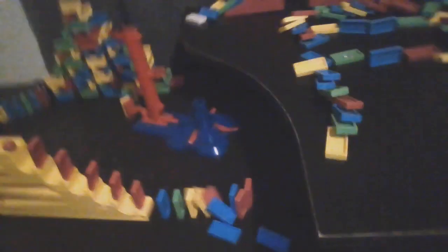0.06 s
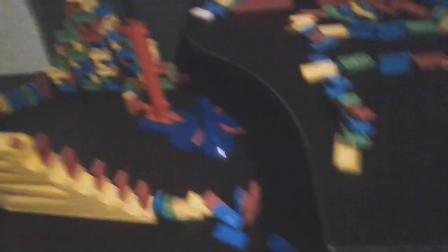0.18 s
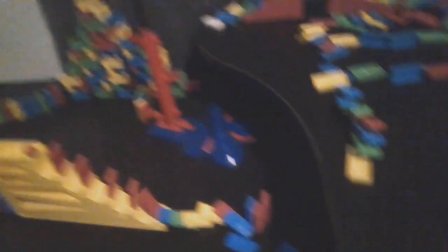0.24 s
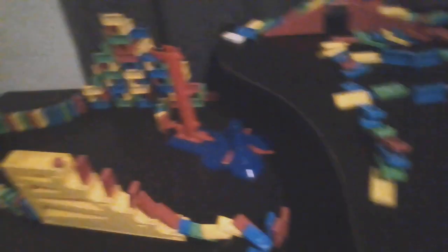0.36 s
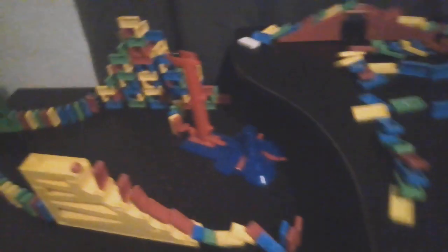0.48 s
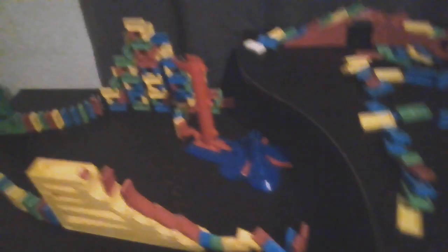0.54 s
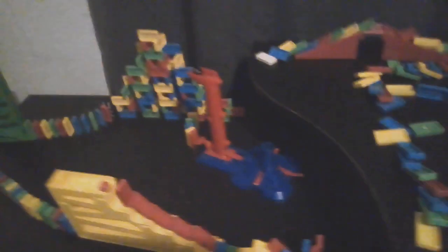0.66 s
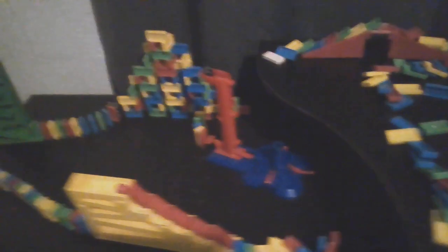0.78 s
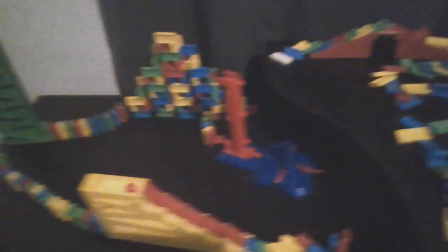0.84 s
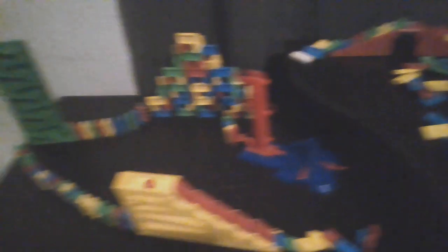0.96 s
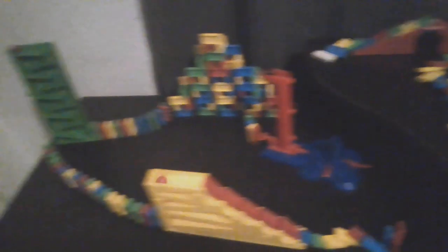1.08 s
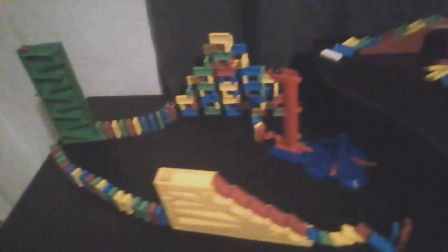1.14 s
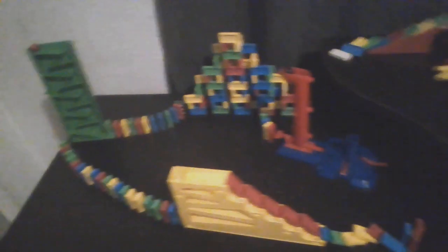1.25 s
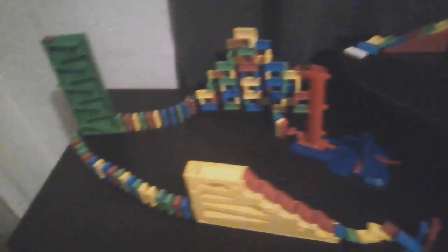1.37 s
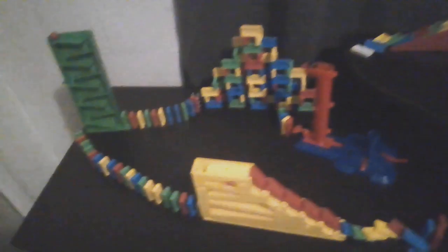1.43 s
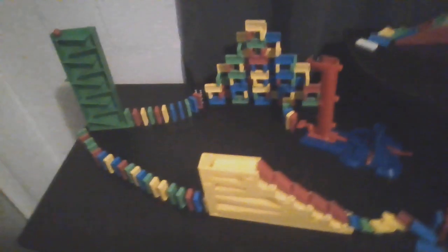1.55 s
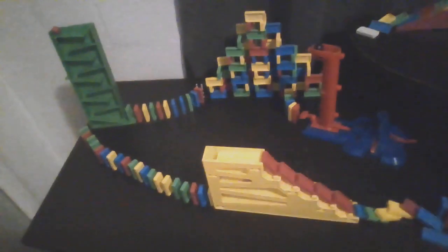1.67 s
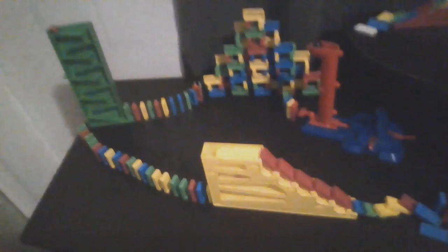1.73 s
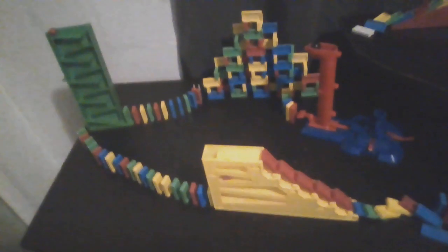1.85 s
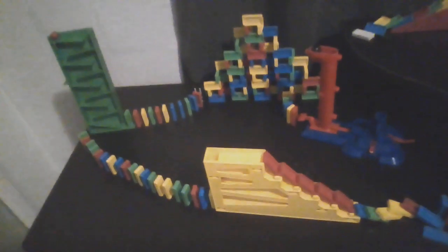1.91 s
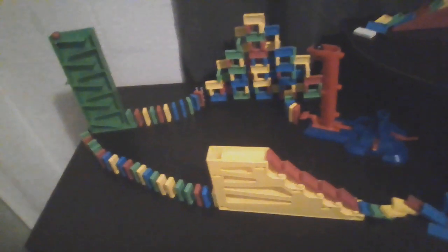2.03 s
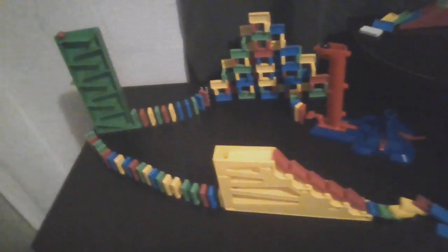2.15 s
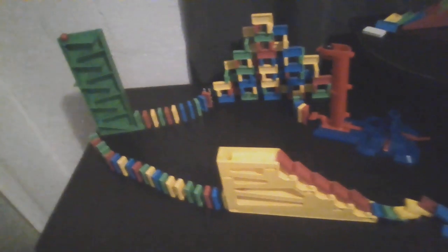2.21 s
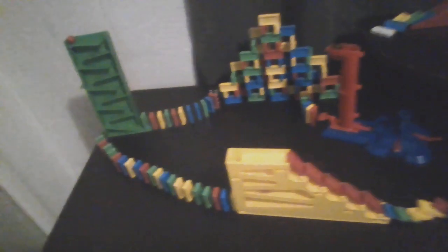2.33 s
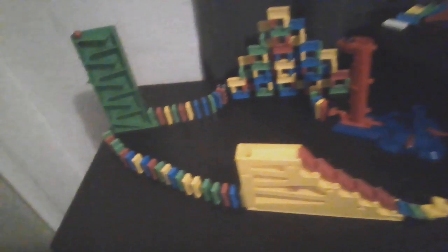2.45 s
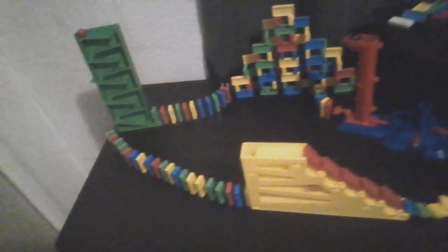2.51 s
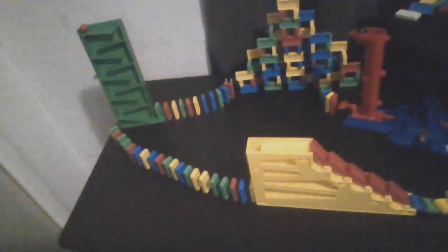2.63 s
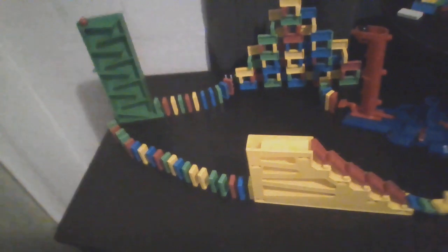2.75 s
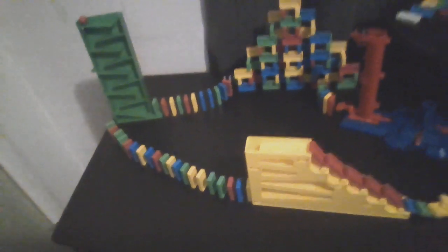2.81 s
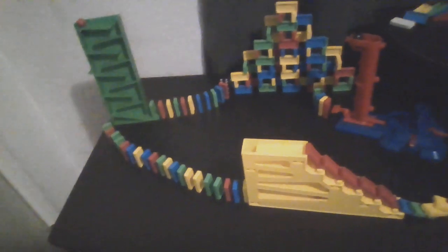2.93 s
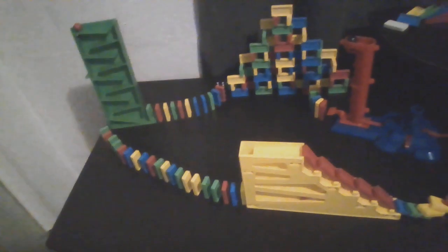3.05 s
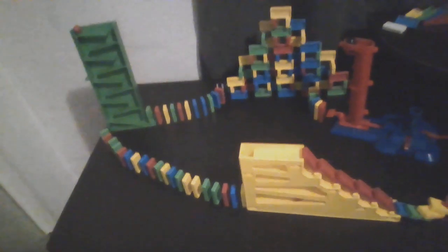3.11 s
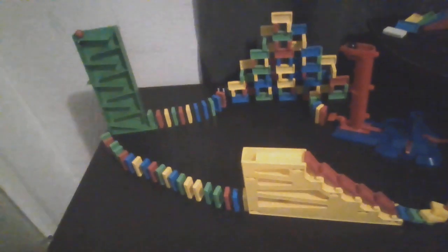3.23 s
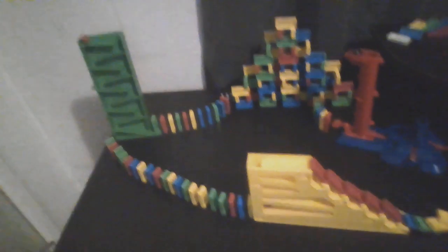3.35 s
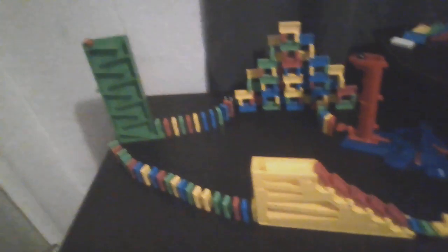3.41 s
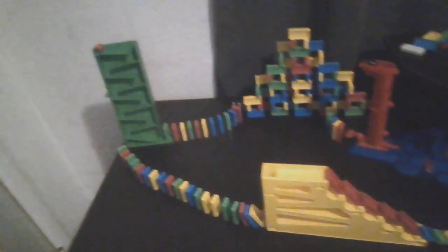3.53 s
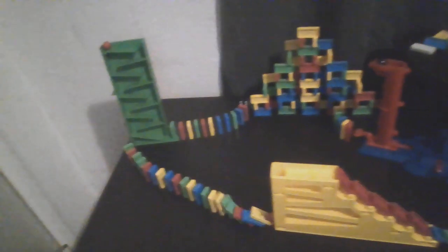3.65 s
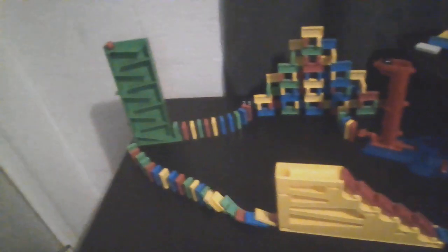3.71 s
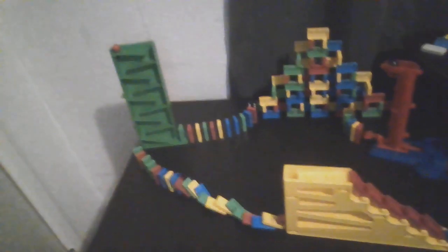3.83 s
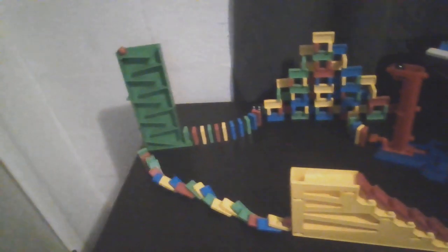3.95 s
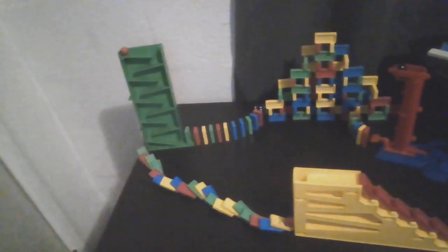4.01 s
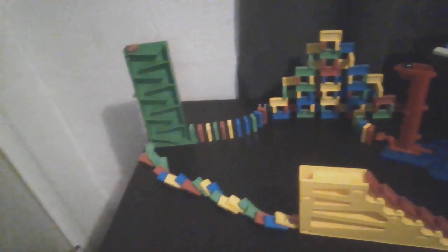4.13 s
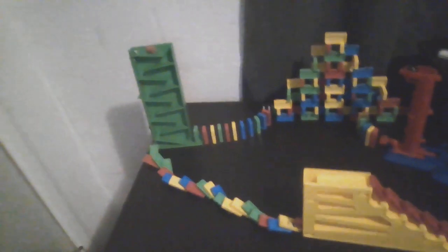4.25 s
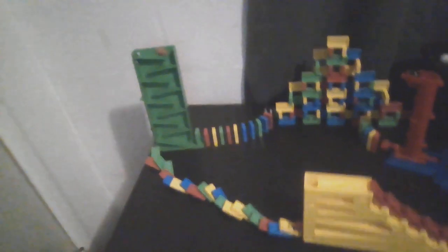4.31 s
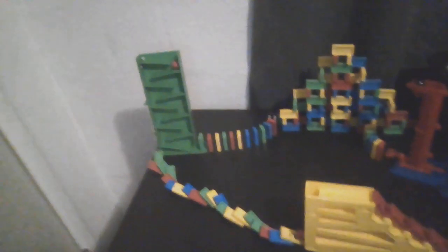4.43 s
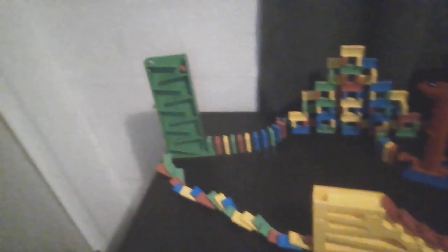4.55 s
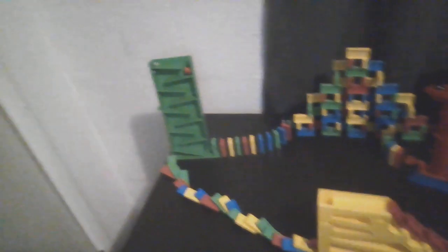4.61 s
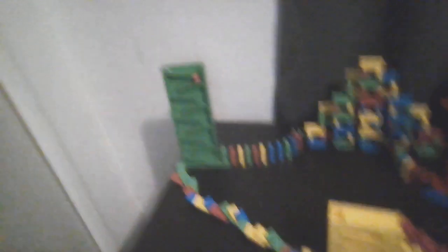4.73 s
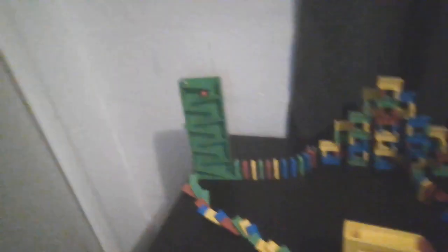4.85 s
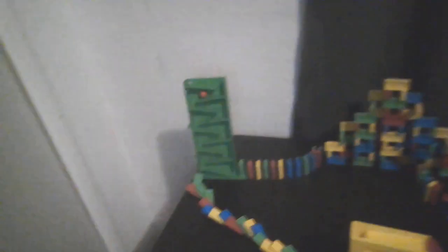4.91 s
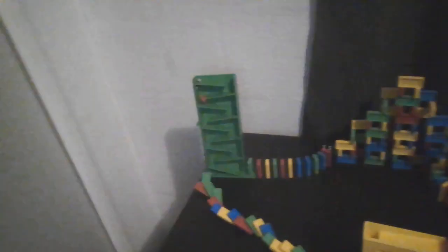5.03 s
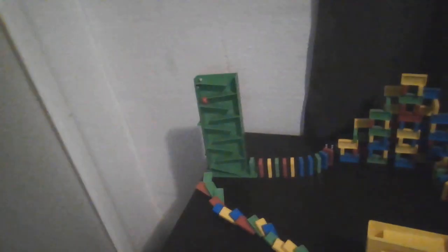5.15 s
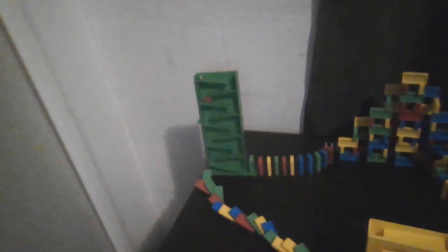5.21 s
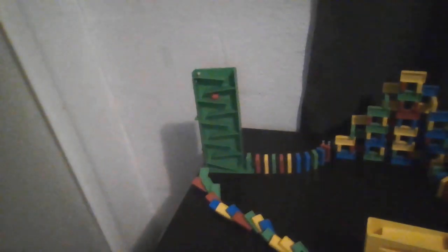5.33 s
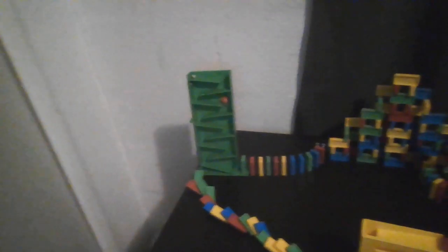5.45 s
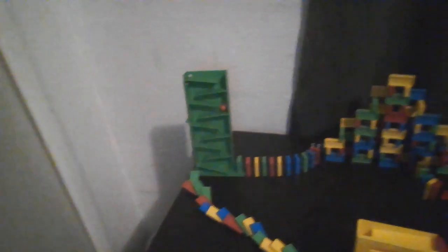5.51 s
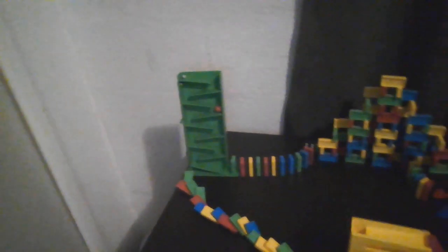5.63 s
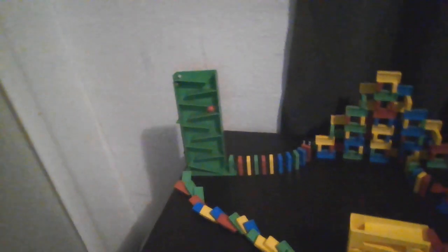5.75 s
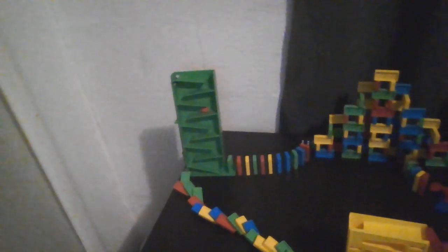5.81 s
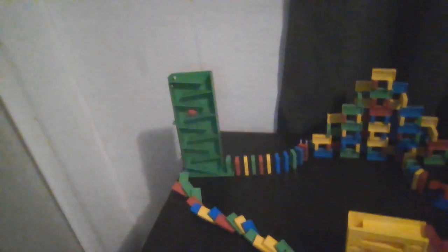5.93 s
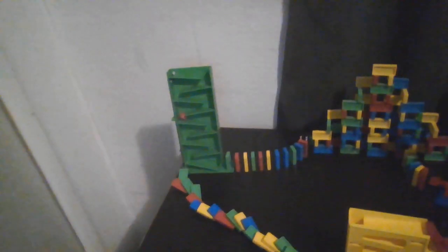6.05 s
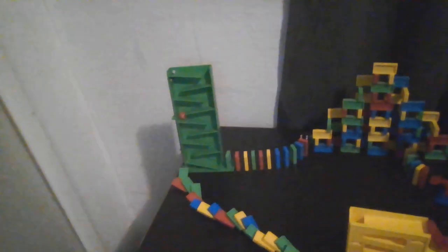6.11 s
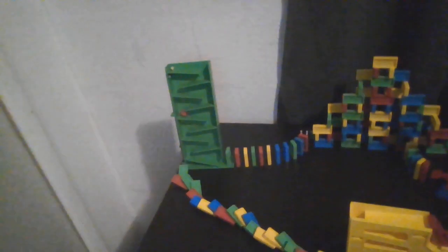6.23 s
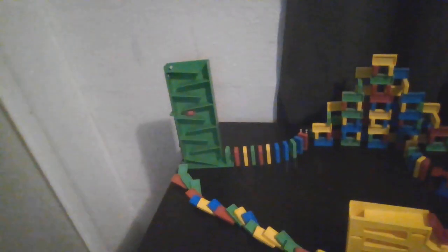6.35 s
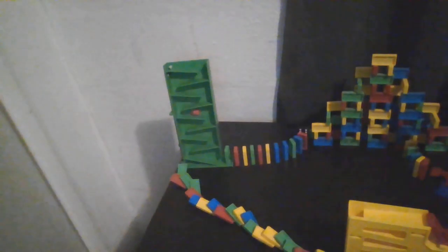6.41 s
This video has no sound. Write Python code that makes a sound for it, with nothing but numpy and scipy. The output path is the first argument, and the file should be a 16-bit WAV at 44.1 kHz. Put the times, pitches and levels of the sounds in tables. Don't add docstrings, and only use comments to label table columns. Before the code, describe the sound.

In a small, fairly dry room, bright plastic tile clicks slow to separate clacks. A marble scrapes and knocks down a hollow zigzag ramp, its rolling swelling before each blow. Then a rapid domino rattle leads to spaced clusters of hollow drops and shrinking bounces in a plastic tower. Hand movement rumbles and fingers bump the microphone; the loudest knocks sound slightly squashed.

```python
import sys
import numpy as np
from scipy import signal
from scipy.io import wavfile

SR = 44100
rng = np.random.default_rng(int(sys.argv[2]) if len(sys.argv) > 2 else 0)


def linear_from_db(decibels):
    return 10 ** (np.asarray(decibels, float) / 20)


def pcm_store(signal):
    levels = np.round(np.clip(np.atleast_2d(signal), -1, 1) * 32767)
    wavfile.write(sys.argv[1], SR, levels.astype(np.int16).T)


N = 285768

# (ratio to the first mode [1], level [dB], decay t60 [s])
TILE_UPPER_MODES = [(1.09, 3.5, 0.0084), (1.16, -6.5, .016), (1.48, -5.5, 0.055), (1.575, -9.5, 0.035),
                    (2.092, -1, 0.043), (2.421, -14, 0.036), (3.079, -13.5, 0.028)]
# (time [s], peak [dB], relative treble [dB], strongest mode [Hz], second mode [Hz])
RAMP_BLOWS = [(1.1656, -2, -8, 3613, 5160), (1.174, -6, -4.5, 2080, 3780), (1.1846, -8, -8.5, 2053, 2910),
              (1.1985, 0, -7, 3504, 2910), (1.2093, -26, -4.5, 3600, 2920),
              (1.2448, -10.5, -4.5, 3590, 2863), (1.2685, -11.5, -9.5, 3495, 2923),
              (1.5826, -1.5, -9.5, 3583, 5310), (1.6076, 0, -4.5, 2920, 5005), (1.609, -14, -8, 1730, 5630),
              (1.6383, -15.5, -7.5, 2973, 5050), (1.9892, -3.5, -5.5, 5080, 3574),
              (2.0148, 0.5, -9, 2920, 3510), (2.016, -11.5, 5, 4740, 7590), (2.061, -8, -6.5, 2880, 3423),
              (2.673, -1, 1, 2650, 1560), (2.6805, -4.5, -15.5, 3509, 3020), (2.712, -6.5, 3.5, 2752, 5700),
              (2.7215, -5.5, -12.5, 2400, 3344), (2.7305, -16, -5.5, 3660, 4610),
              (2.75, -7, -7.5, 2460, 5640), (2.7731, -11.5, -11, 2460, 5760)]
RISE_CYCLES = 1.6
TICK_HZ = 7000


def rms_one(x):
    return x / np.sqrt(np.mean(x ** 2) + 1e-20)


def in_time(rows, outside):
    s, *columns = np.transpose(rows)
    return [np.interp(np.arange(N) / SR, s, c, outside, outside) for c in columns]


def band(x, kind, hz, order=2):
    return signal.sosfilt(signal.butter(order, hz, kind, fs=SR, output="sos"), x)


def spikes(times, heights):
    return np.bincount(np.round(np.asarray(times) * SR).astype(int), heights, N)[:N] + 1e-18


def ring(clicks, hz, t60):
    r, w = linear_from_db(-60 / (t60 * SR)), 2 * np.pi * hz / SR
    return signal.lfilter([0, np.sin(w)], [1, -2 * r * np.cos(w), r * r], clicks)


def dying(times, level_db, t60):
    power = spikes(times, linear_from_db(2 * level_db))
    return np.sqrt(signal.lfilter([1], [1, -linear_from_db(-120 / (t60 * SR))], power))


def taps(times, level_db, hz, t60):
    out, t = np.zeros(N + SR), np.arange(SR // 10) / SR
    for s, db, f in zip(times, level_db, hz):
        at = round(s * SR)
        rise = 1 - np.exp(-t * f / RISE_CYCLES)
        out[at:at + len(t)] += linear_from_db(db - 60 * t / t60) * np.sin(2 * np.pi * f * t) * rise
    return out[:N]


def clatter(times, level_db, treble_db, linger, crack_db):
    # (frequency [Hz], level per Hz [dB], decay t60 [s])
    dense_modes = [(298.4, -15.5, 0.27), (930, -9, 0.015), (1240, -10, 0.26), (2400, -9.5, 0.17),
                   (5000, -2, 0.14), (6070, -24, 0.14), (8700, -16.5, 0.15), (10700, -16.5, 0.13),
                   (16300, -17.5, 0.16)]
    hz, per_hz_db, t60 = np.transpose(dense_modes)
    edges = 250 * 2 ** np.arange(0, 6.1, .5)
    white = rng.standard_normal((2, N))
    out = 0
    for k, (low, high) in enumerate(zip(edges, edges[1:])):
        center = np.log(low * high) / 2
        treble = np.clip(np.log2(low / 2500), 0, 1) * treble_db
        blow_db = level_db + treble + np.interp(center, np.log(hz), per_hz_db)
        tail_t60 = linger * np.interp(center, np.log(hz), t60)
        start = times + RISE_CYCLES / low
        tail = dying(start, blow_db, tail_t60)
        crack = dying(start, blow_db + crack_db + 4.9 * np.log2(low / 2000), 0.017)
        out = out + band(white[k % 2], "band", [low, high]) * (tail + crack)
    return out


def tile_contacts():
    # (time [s], ring [dB], first bending mode [Hz], relative table clack [dB])
    step_chain = [(0.0002, -11, 5000, -0.5), (0.042, -23.5, 5000, 1), (0.046, -26, 5000, 7),
                  (0.0957, -34, 5000, 6.5), (0.0139, -1, 4996, -37.5), (0.051, 0.5, 5000, -20.5),
                  (0.0594, 0.5, 4970, -15), (0.0715, -14.5, 4970, -15), (0.0755, -5.5, 4970, -18),
                  (0.1006, -15.5, 5000, -6.5), (0.1225, -20.5, 5000, 3), (0.1255, -8.5, 5000, -26.5),
                  (0.1368, -29.5, 4840, -8.5), (0.16, -10, 4970, -2.5), (0.1842, -12.5, 5050, -14.5),
                  (0.2317, -11, 5000, 3), (0.2365, -11, 4970, -4), (0.2447, -10.5, 4850, -2),
                  (0.2689, -23.5, 5070, -18), (0.2887, -17.5, 5330, -1.5), (0.349, -46, 5000, 17.5),
                  (0.4052, -21, 5065, 2), (0.4165, -26, 5150, 8.5), (0.536, -8.5, 5080, -3.5),
                  (0.549, -21, 5360, 2), (0.651, -22, 5120, 7), (0.6555, -9.5, 5233, -2),
                  (0.663, -22, 5300, 2.5), (0.772, -12.5, 5340, -1), (0.791, -23, 5250, -8),
                  (0.8266, -24.5, 5120, 10)]
    # (time [s], ring [dB], relative upper modes [dB], relative table clack [dB])
    flat_chain = [(3.4712, -16, -4.5, -2), (3.4974, -10.5, -10.5, -18.5), (3.5495, -18, -10, -22.5),
                  (3.5948, -23, -6.5, 5), (3.6046, -12.5, -8.5, -9), (3.6111, -18, -8, 9),
                  (3.6482, -14.5, -2, 1.5), (3.6703, -14.5, -3, 0), (3.6882, -9, 3, -4),
                  (3.7104, -11.5, 3.5, -1), (3.7324, -0.5, -9, -16), (3.7582, -9.5, 0.5, -8.5),
                  (3.7775, -6.5, -3.5, -6), (3.8043, -3, -7.5, -14.5), (3.8308, -4, -7.5, -6),
                  (3.8562, -8.5, -4, -5), (3.8784, -3.5, 1, -10.5), (3.8996, -12, 5, -19.5),
                  (3.9215, -9, -0.5, -12), (3.9395, -7.5, -15.5, -25.5), (3.9506, -9, 1.5, -9.5),
                  (3.9738, -2.5, -3.5, -13), (3.9882, -4, -6.5, -13), (4.0058, -5.5, -3.5, -6),
                  (4.0137, -3, -14, -15.5), (4.028, -10.5, -10.5, -12.5), (4.0465, -4, -9.5, -11.5),
                  (4.068, -11, 0, -15.5), (4.0822, -12, 8.5, 1), (4.0924, -20, 5, 7.5)]
    # (time [s], ring [dB])
    tile_slips = [(3.6255, -13), (3.6365, -11.5), (3.661, -15.5), (3.6785, -21.5), (3.7178, -20),
                  (3.7465, -19), (3.766, -8.5), (3.795, -9.5), (3.8115, -12), (3.8225, -10.5),
                  (3.8451, -10), (3.866, -9), (3.886, -16), (3.9035, -3), (3.911, -7), (3.932, -5),
                  (3.957, -8), (3.965, -21), (3.999, -11.5), (4.035, -11.5), (4.0575, -7), (4.1025, -20.5),
                  (4.116, -14.5)]
    first = np.array(step_chain)
    upper_db = -4 + 0.28 * first[:, 3]
    first = np.insert(first, 3, upper_db, axis=1)
    slips = [(s, db, -9.5, -10) for s, db in tile_slips]
    second = np.array(list(flat_chain) + slips)
    tile_hz = 5020 * (1 + .014 * rng.standard_normal(len(second)))
    return np.vstack([first, np.insert(second, 2, tile_hz, axis=1)])


def tile_rings(rows):
    out, t = np.zeros(N + SR), np.arange(SR // 8) / SR
    ratio, mode_db, t60 = np.repeat(np.transpose(TILE_UPPER_MODES), 2, axis=1)[:, :, None]
    luck = rng.random((len(rows), 4 + 6 * len(TILE_UPPER_MODES)))
    for (s, level_db, hz, upper_db, _), u in zip(rows, luck):
        partner_hz = hz * (1 + 0.075 * (u[:2, None] - .4))
        partners = np.sin(2 * np.pi * (partner_hz * t + u[2:4, None]))
        first = np.sin(2 * np.pi * hz * t) + 0.14 * partners.sum(axis=0)
        first = first * (1 - np.exp(-t / 0.0015))
        upper_hz = hz * ratio * (1 + 0.05 * (u[4::3, None] - .5))
        upper = np.sin(2 * np.pi * (upper_hz * t + u[5::3, None]))
        fading = linear_from_db(mode_db + 10 * (u[6::3, None] - .9) - 60 * t / t60)
        upper = np.sum(upper * fading, axis=0)
        at = round(s * SR)
        out[at:at + len(t)] += linear_from_db(level_db + 0.5 - 60 * t / 0.036) * first
        out[at:at + len(t)] += linear_from_db(level_db + upper_db - 8.5) * upper
    return out[:N]


def tile_chatter(rows):
    chatter_pitches = (4990, 5130, 5330)
    s, level_db, hz, upper_db, _ = rows.T
    white = rng.standard_normal(N)
    nearest = np.argmin(abs(hz[:, None] - chatter_pitches), axis=1)
    out = np.zeros(N)
    for k, f in enumerate(chatter_pitches):
        mine = nearest == k
        out += rms_one(ring(white, f, 0.03)) * dying(s[mine], level_db[mine] - 17, 0.1)
    for multiple, rel_db, _ in TILE_UPPER_MODES:
        hum = rms_one(ring(white, 5060 * multiple, 0.019))
        out += hum * dying(s, level_db + upper_db + rel_db - 25.0, 0.17)
    return out


def tiles():
    # (frequency [Hz], level [dB], decay t60 [s])
    board_modes = [(403, -36.5, 0.037), (570, -20, 0.03), (1210, -40, 0.043), (3400, -17.5, 0.042)]
    rows = tile_contacts()
    s, level_db, _, upper_db, clack_db = rows.T
    out = tile_rings(rows) + tile_chatter(rows)
    for board_hz, board_db, board_t60 in board_modes:
        luck_db = 3.1 * rng.standard_normal(len(s))
        thuds = spikes(s, linear_from_db(level_db + clack_db + board_db + luck_db))
        out += ring(thuds, board_hz, board_t60)
    out += band(spikes(s, linear_from_db(level_db + upper_db - 1.5)), "high", TICK_HZ)
    treble_db = 0.42 * (upper_db - clack_db) - 11.5
    return out + clatter(s, level_db + clack_db + 2.0, treble_db, linger=.75, crack_db=-5)


def landings():
    # (time [s], peak [dB], pitch [Hz])
    step_landings = [(.0001, 3, 5200), (.0145, -17.5, 1490), (.0965, -20.5, 2800), (.162, -16.5, 2520),
                     (.538, -16.5, 3450), (.66, -16, 1250), (.778, -22.5, 1730), (0.0463, -16.5, 2700),
                     (0.0588, -16, 2910), (0.096, -18.5, 1510), (0.1221, -14, 3470), (0.1595, -19, 3600),
                     (0.184, -22, 3550), (0.2402, -7, 3250), (0.2887, -20.5, 2590), (0.3514, -36, 2500),
                     (0.407, -24, 1240), (0.4163, -18, 1200), (0.535, -12, 1210), (0.6569, -10.5, 3620),
                     (0.7765, -15.5, 3350), (0.829, -14, 3730)]
    flat_landings = [(3.4693, -32, 2720), (3.4815, -37, 3360), (3.4983, -25, 3490), (3.5304, -33, 3600),
                     (3.551, -32, 3510), (3.5942, -15.5, 3290), (3.612, -14.5, 3270), (3.657, -12, 3320),
                     (3.6888, -11.5, 2710), (3.7092, -17, 3240), (3.7296, -16.5, 2710),
                     (3.7497, -14.5, 2590), (3.7764, -22, 2600), (3.7994, -20.5, 3240),
                     (3.8309, -15.5, 2380), (3.8534, -27.5, 3780), (3.8788, -16.5, 3200),
                     (3.9288, -16, 3410), (3.9497, -16.5, 2890), (3.9792, -10, 3450), (3.9927, -11, 3420),
                     (4.0275, -11.5, 3250), (4.0473, -15.5, 3150), (4.0817, -12, 3140), (4.1378, -35, 2200)]
    s, level_db, hz = np.transpose(list(step_landings) + list(flat_landings))
    return taps(s, level_db - 6.5, hz, 0.036)


def room(x):
    t60 = 0.23
    t = np.arange(SR // 2) / SR
    tail = band(rng.standard_normal(len(t)), "low", 6000, order=1) * linear_from_db(-60 * t / t60) * (t > .004)
    return signal.fftconvolve(x, tail / np.sqrt(np.sum(tail ** 2)))[:N]


def handling():
    # (time [s], level [dB])
    hand_sway = [(0.0, -45), (0.38, -25), (1.12, -36), (1.33, -28), (2.29, -42), (2.31, -38), (3.21, -37),
                 (3.25, -21), (3.28, -33.5), (3.52, -40.5), (3.55, -16.5), (3.61, -44.5), (3.66, -40),
                 (4.98, -37), (5.02, -42), (5.36, -29), (6.44, -46.5), (6.48, -39.5)]
    # (time [s], peak [dB], pitch [Hz])
    finger_thumps = [(0.349, -16.5, 168), (0.4466, -20, 170), (0.7326, -24.5, 116), (0.9486, -32, 128),
                     (1.11, -27, 176), (1.289, -24.5, 186), (1.525, -24, 132), (1.725, -24.5, 166),
                     (1.8768, -29, 217), (1.917, -24, 125), (2.3223, -22, 124), (2.4195, -25, 180),
                     (2.4763, -24, 180), (2.642, -22.5, 184), (2.798, -24.5, 183), (3.2513, -21, 187),
                     (3.548, -19.5, 195), (4.1607, -21, 197), (4.262, -22.5, 126), (4.6776, -28, 193.5),
                     (4.7936, -27, 213), (4.825, -24.5, 201), (4.9015, -18.5, 126.5), (2.847, -31.5, 194),
                     (6.035, -30.5, 159), (5.171, -27, 177), (5.317, -24, 222), (5.335, -33, 121.3),
                     (5.421, -21, 195), (5.8273, -27, 190)]
    sway_db, = in_time(hand_sway, None)
    creak_db = -45 + sway_db - sway_db.mean()
    white = rng.standard_normal((4, N + SR))
    lumps = linear_from_db(4.13 * rms_one(band(white[3], "low", 11.7)))
    sway = band(white[0] * lumps, "low", 1.6, order=1)
    sway = rms_one(band(sway, "band", [7, 110])[SR:])
    creak = band(white[1] * lumps ** 2.0, "low", 190)
    creak = rms_one(band(creak, "high", 130, order=1)[SR:])
    out, t = np.zeros(N + SR), np.arange(SR // 12) / SR
    for s, level_db, hz in finger_thumps:
        at = round(s * SR)
        pull = (t / 0.0021) * np.exp(1 - t / 0.002) * np.sin(2 * np.pi * hz * t)
        snap = 0.22 * np.exp(-t / 0.0017) * np.sin(2 * np.pi * 400 * t)
        snap = snap * linear_from_db(2.9 * (level_db + 7.0))
        recovery = 0.045 * np.exp(-t / 0.048) * np.sin(2 * np.pi * 60 * t)
        out[at:at + len(t)] -= linear_from_db(level_db + 1.5) * (pull + recovery + snap)
    hiss = linear_from_db(-60.5) * white[2, :N]
    return linear_from_db(sway_db + 3.5) * sway + linear_from_db(creak_db - 2.0) * creak + out[:N] + hiss


def rolling(slopes, seams):
    points = []
    for start, end, start_db, end_db in slopes:
        points += [(start, start_db), (end, end_db), (end + 0.0082, end_db - 13)]
    s, jolt_db, hz, next_hz = np.transpose(seams)
    power = linear_from_db(2 * in_time(points, -89)[0]) + dying(s, jolt_db - 10.5, 0.066) ** 2
    last = np.maximum(np.searchsorted(s, np.arange(N) / SR) - 1, 0)
    return 10 * np.log10(power), hz[last], next_hz[last]


def marble_roll(slopes, seams, modes, roll_db, dull_db, top_hz, reach):
    span = slice(round(slopes[0][0] * SR), min(round(slopes[-1][1] * SR) + SR // 20, N))
    speed_db, place_hz, next_hz = [curve[span] for curve in rolling(slopes, seams)]
    ridges = rms_one(band(rng.standard_normal(N), "band", [20, 120]))
    grains = rng.standard_normal(N) * (1 + 0.71 * (rng.random(N) < 600 / SR))
    grit = grains[span] * linear_from_db(speed_db + 0.94 * ridges[span])
    slope_db = dull_db - 0.37 * (speed_db + 65.5)
    rolled = sum(ring(grit * linear_from_db(-27.5), hz, 0.031) for hz in (600, 1053)) / np.sqrt(SR / 200)
    for hz, mode_db, t60 in [mode for mode in modes if mode[0] < top_hz]:
        apart = np.minimum(abs(np.log(hz / place_hz)), abs(np.log(hz / next_hz)))
        under_db = 12 * np.exp(-(apart / reach) ** 2)
        own_db = .45 * min(mode_db, 4)
        tilt_db = roll_db + own_db - slope_db * np.log2(hz / 1500) + under_db
        wander = np.interp(np.arange(len(grit)) / SR * 26, np.arange(100), rng.standard_normal(100))
        rolled += ring(grit * linear_from_db(tilt_db + 3.5 * wander), hz, 0.5 * t60) / np.sqrt(t60 * SR / 20)
    rolled += linear_from_db(roll_db + 9) * band(grit, "band", (902, 4300), order=1) / 3
    out = np.zeros(N)
    out[span] = band(rolled, "low", top_hz, order=4)
    return out


def seam_taps(seams):
    s, jolt_db, hz, next_hz = np.transpose(seams)
    return taps(s, jolt_db - 10, hz, 0.066) + taps(s, jolt_db - 13.5, next_hz, 0.066)


def knock(modes, treble_db, main_hz, second_hz, luck, wall_db, loose_db):
    t = np.arange(SR // 7) / SR
    hz, mode_db, t60 = np.transpose(modes)
    hz = hz * (1 + .008 * luck[1])
    level_db = 0.62 * mode_db - 16.0 + np.clip(np.log2(hz / 2500), 0, 1) * treble_db
    level_db = np.minimum(level_db + 2.2 * luck[0], -11)
    level_db = level_db + wall_db * (abs(np.log2(hz / 1600) + .35) < .35)
    for near_hz, near_db in (second_hz, -5 - 6 * linear_from_db(loose_db)), (main_hz, -.5):
        k = np.argmin(abs(hz - near_hz))
        level_db[k], hz[k] = near_db, near_hz
    hz = np.append(hz, [main_hz * 1.057, second_hz * 1.057, main_hz * 0.965])[:, None]
    t60 = np.append(t60, [0.028, 0.028, 0.06])[:, None]
    level_db = np.append(level_db, [-13.5, -21.5, loose_db])[:, None]
    fading = linear_from_db(-60 * t / t60) + 0.72 * linear_from_db(-60 * t / (0.67 * t60))
    rise = 1 - np.exp(-t * hz / RISE_CYCLES)
    return np.sum(linear_from_db(level_db) * fading * np.sin(2 * np.pi * hz * t) * rise, axis=0)


def marble_knocks(knocks, modes, knock_db, loose_db):
    s, level_db, treble_db, main_hz, second_hz = np.transpose(knocks)
    out = np.zeros(N + SR)
    draws = rng.standard_normal((2, len(s), 2, len(modes)))
    shelf = np.cumsum(np.diff(s, prepend=0) > .1) - 1
    wall_db = 6 * (np.diff(shelf, prepend=-1) > 0)
    lucks = 0.76 * draws[0][shelf] + [[.8], [.4]] * draws[1]
    for k, luck in enumerate(lucks):
        blow = knock(modes, treble_db[k] + 10.0, main_hz[k], second_hz[k], luck, wall_db[k], loose_db)
        at = round(s[k] * SR)
        out[at:at + len(blow)] += linear_from_db(level_db[k] + knock_db) * blow
    return out[:N]


def marble_in_ramp():
    # (frequency [Hz], level [dB], decay t60 [s])
    ramp_modes = [(588, -24, 0.16), (1000, -28, 0.25), (1386, -3, 0.084), (1673, 2, 0.034),
                  (1980, -4, 0.08), (2242, -4, 0.15), (2460, 4.5, 0.027), (2720, -8, 0.057),
                  (2920, 13, 0.079), (3490, 5, 0.087), (3290, -4, 0.077), (3674, -10.5, 0.044),
                  (4740, 2.5, 0.059), (5050, -27, 0.049), (5670, -6.5, 0.049), (6460, -20, 0.031),
                  (7215, -24.5, 0.12), (7760, -16.5, 0.05), (8860, -24.5, 0.027), (10660, -18.5, 0.066)]
    # (start [s], end [s], start level [dB], end level [dB])
    ramp_slopes = [
        (0.92, 1.128, -49.5, -38),
        (1.37, 1.552, -55, -44.5),
        (1.79, 1.95, -58.5, -42),
        (2.21, 2.639, -57.5, -40.5),
        (2.98, 3.448, -61, -37),
    ]
    # (time [s], peak [dB], panel [Hz], next panel [Hz])
    ramp_seams = [(0.9338, -46, 2230, 3320), (0.9543, -36, 2230, 3600), (0.9777, -26, 2270, 3780),
                  (1.0201, -30, 2220, 3810), (1.048, -27.5, 2070, 3780), (1.079, -26, 2120, 3320),
                  (1.1109, -37, 2230, 3310), (1.1304, -23, 2240, 3880), (1.3699, -40.5, 2340, 3490),
                  (1.4342, -34.5, 2830, 3480), (1.4661, -34.5, 2920, 3420), (1.5235, -24, 2920, 3536),
                  (1.7708, -37.5, 2770, 3580), (1.8436, -32, 2970, 3150), (1.8496, -25, 2940, 3180),
                  (1.9284, -27.5, 2990, 3570), (1.9424, -24, 2930, 3590), (2.2488, -44, 2910, 2340),
                  (2.2997, -36, 2920, 2330), (2.3725, -29, 3000, 3490), (2.4154, -24, 3500, 2870),
                  (2.4773, -30.5, 2940, 3500), (2.5037, -23.5, 3490, 2930), (2.525, -33, 3500, 4740),
                  (2.542, -31, 2900, 3500), (2.5716, -27.5, 3490, 2930), (2.582, -21.5, 3560, 2870),
                  (2.615, -35, 3490, 2930), (2.6354, -33, 3520, 2920), (3.0422, -35, 2510, 3420),
                  (3.1131, -27.5, 2550, 3300), (3.1819, -35, 2470, 3280), (3.2168, -23, 2750, 3410),
                  (3.2707, -40, 2340, 3270), (3.2867, -32, 2590, 3400), (3.3016, -19.5, 2520, 3340),
                  (3.3959, -35, 2310, 3380), (3.4054, -32, 2710, 3340)]
    rolled = marble_roll(ramp_slopes, ramp_seams, ramp_modes, roll_db=-8.5, dull_db=15.5, top_hz=5000,
                         reach=0.061)
    knocked = marble_knocks(RAMP_BLOWS, ramp_modes, knock_db=-8.0, loose_db=-19)
    return knocked + rolled + seam_taps(ramp_seams)


def tower_blows():
    # (time [s], peak [dB], relative treble [dB], strongest mode [Hz], second mode [Hz])
    tower_drops = [(4.1364, -14, -2, 2215, 3260), (4.1634, -12, -17.5, 2190, 4260),
                   (4.1923, -25, -11, 2190, 1866), (4.401, -3.5, -0.5, 3616, 1240),
                   (4.4025, -10, 0, 4300, 5720), (4.4035, -8.5, -14, 1386, 1036),
                   (4.4308, -5, 2.5, 2390, 3444), (4.4335, -11, -5.5, 4440, 3150),
                   (4.4549, -28, -9, 2340, 3670), (4.4686, -12.5, -14.5, 2420, 4390),
                   (5.0485, -10.5, 1, 2200, 1410), (5.05, -16, -7.5, 1822, 3430),
                   (5.0705, -4, 0, 2455, 3557), (5.0855, -17.5, -9.5, 2460, 3610),
                   (5.1082, -11, -6.5, 2470, 4020), (5.4697, -20.5, -24, 2515, 1210),
                   (5.5183, -4, -12, 2380, 1421), (5.5431, -1.5, 0.5, 4220, 3614),
                   (5.555, -7, -26, 2390, 4230), (5.5797, -6.5, -7.5, 4182, 2430),
                   (6.0666, -9, 0, 2400, 1262), (6.0899, -5, 3.5, 2468, 4056),
                   (6.0915, -6.5, -4, 4059, 2096), (6.1232, -11, -5, 2374, 4470),
                   (6.435, -24.5, -21.5, 2454, 1236)]
    # (first touch [s], peak [dB], first hop [s], strongest mode [Hz], second mode [Hz])
    shelf_settles = [
        (4.4996, -19, .0185, 4330, 2444),
        (5.1462, -14, .0264, 2453, 4280),
        (5.6115, -14.5, .0225, 2430, 4240),
        (6.1578, -14, .0256, 2430, 4300),
    ]
    shrink = 0.83
    hops = []
    for s, db, hop, *shelf_hz in shelf_settles:
        for k in range(5):
            touch = s + hop * (1 - shrink ** k) / (1 - shrink)
            hops.append((touch, db - 2.5 * k, -8.5 - 2.5 * k, *shelf_hz))
    return sorted(list(tower_drops) + hops)


def marble_in_tower(blows):
    # (frequency [Hz], level [dB], decay t60 [s])
    tower_modes = [(692, -7.5, 0.052), (1033, -15.5, 0.2), (1197, -8, 0.1), (1437, -8.5, 0.077),
                   (1500, -1, 0.066), (1850, -18, 0.2), (2190, -2.5, 0.11), (2460, -10, 0.085),
                   (2383, 10.5, 0.097), (3170, 3.5, .04), (3380, -5.5, 0.069), (3610, 19.5, 0.06),
                   (4130, 14, 0.034), (4240, 12, 0.065), (4710, 4, 0.054), (4830, -6, 0.062),
                   (5560, -23, 0.05), (7020, -20, 0.08), (7450, -23.5, .035)]
    # (start [s], end [s], start level [dB], end level [dB])
    tower_slopes = [
        (4.238, 4.37, -47, -40.5),
        (4.701, 4.99, -66, -49),
        (5.286, 5.464, -58.5, -48),
        (5.796, 6.031, -63, -44),
        (6.331, 6.459, -64.5, -42),
    ]
    # (time [s], peak [dB], panel [Hz], next panel [Hz])
    tower_seams = [(4.274, -24.5, 1370, 2250), (4.3528, -22.5, 2200, 1376), (4.829, -40, 1473, 2400),
                   (4.994, -26.5, 2420, 1450), (5.31, -31.5, 2400, 1385), (5.384, -27, 2400, 1385),
                   (5.909, -33.5, 1143, 1600), (6.01, -30, 1580, 2400)]
    rolled = marble_roll(tower_slopes, tower_seams, tower_modes, roll_db=-10.0, dull_db=15.0, top_hz=3300,
                         reach=0.093)
    knocked = marble_knocks(blows, tower_modes, knock_db=-8.5, loose_db=-7.5)
    return knocked + rolled + seam_taps(tower_seams)


def marble_clatter(blows):
    s, level_db, treble_db = np.transpose(list(RAMP_BLOWS) + blows)[:3]
    hiss_db = treble_db - 2.5 - 2 * (s < 2.98)
    ticks = band(spikes(s, linear_from_db(level_db + treble_db - 14)), "high", TICK_HZ)
    return ticks + clatter(s, level_db - 2.0, hiss_db, linger=0.52, crack_db=-6.0)


def scene():
    blows = tower_blows()
    toys = tiles() + landings()
    toys += marble_in_ramp() + marble_in_tower(blows) + marble_clatter(blows)
    return (toys + linear_from_db(-14) * room(toys) + handling())[None]


def low_pass(x):
    return signal.sosfilt(signal.butter(12, 16460, fs=SR, output="sos"), x)


def record(dry):
    mix = 1.12 * np.tanh(dry / 0.94)
    return low_pass(mix)


dry = scene()
out = record(dry)
pcm_store(out)
```